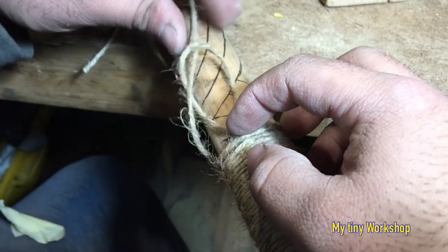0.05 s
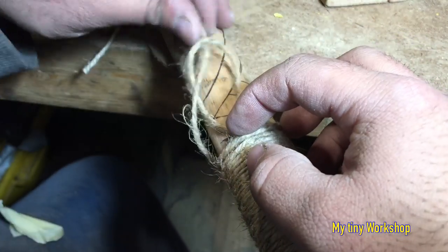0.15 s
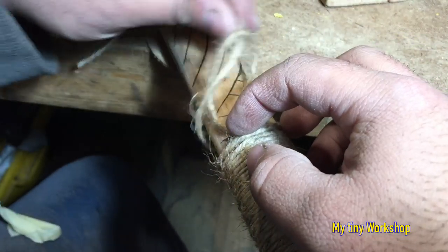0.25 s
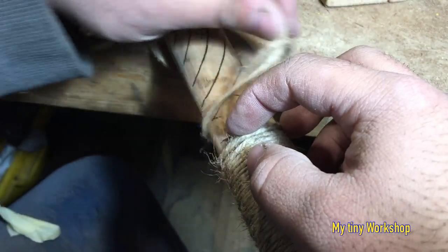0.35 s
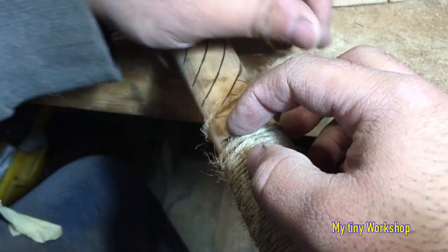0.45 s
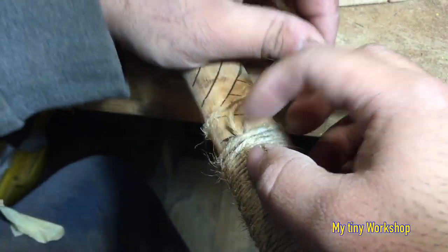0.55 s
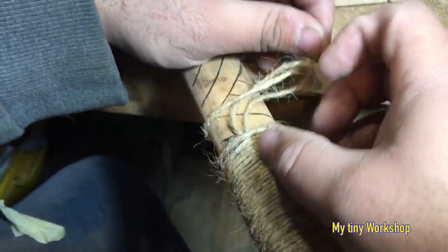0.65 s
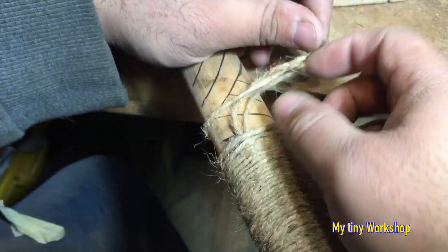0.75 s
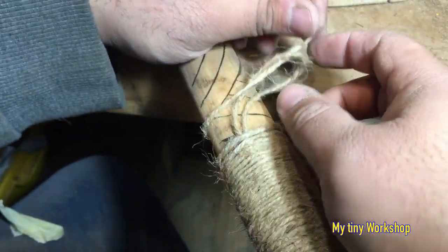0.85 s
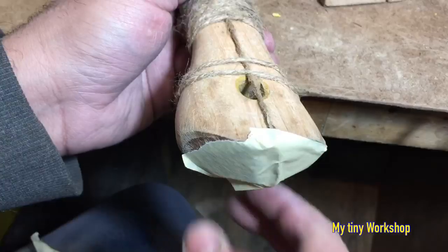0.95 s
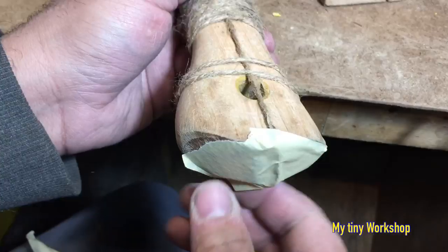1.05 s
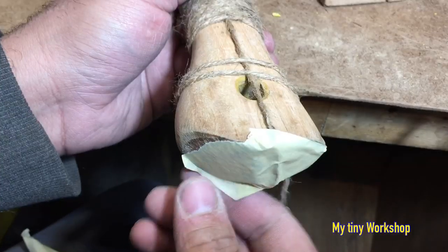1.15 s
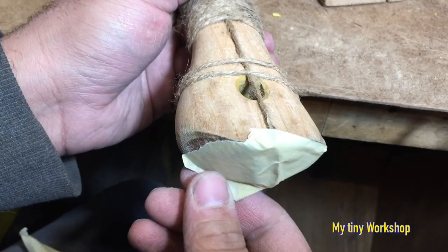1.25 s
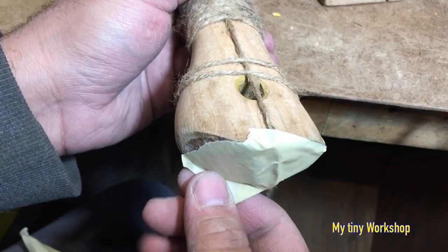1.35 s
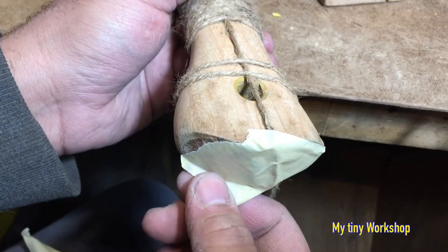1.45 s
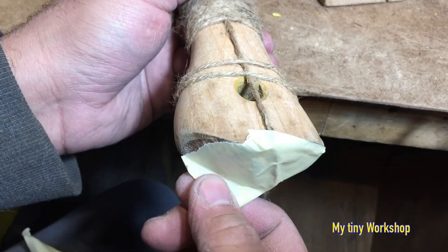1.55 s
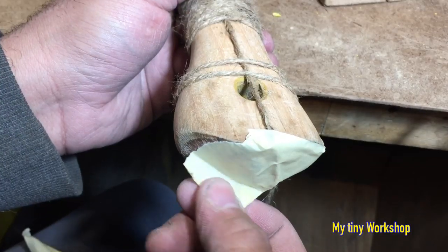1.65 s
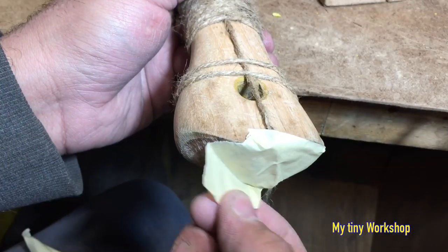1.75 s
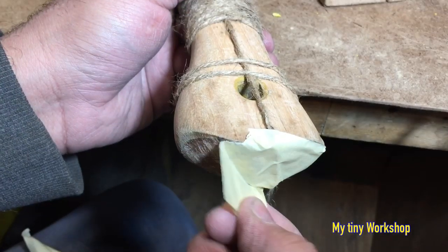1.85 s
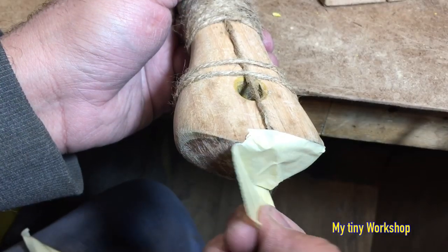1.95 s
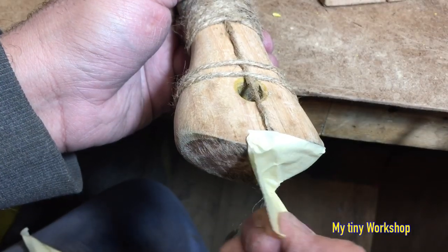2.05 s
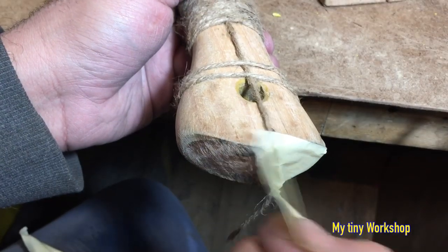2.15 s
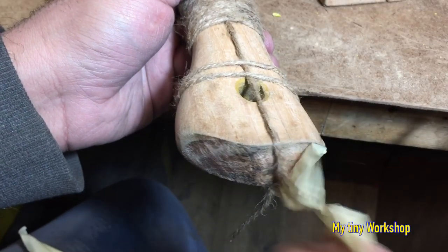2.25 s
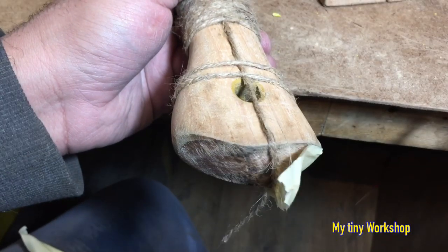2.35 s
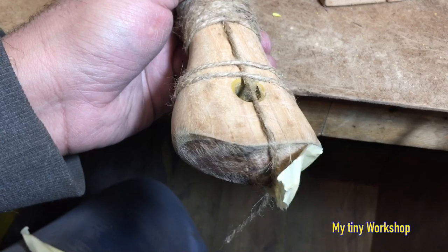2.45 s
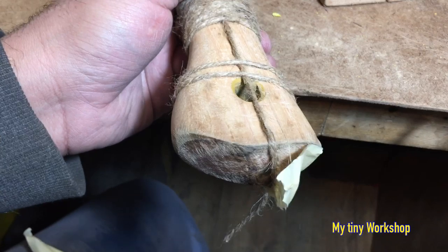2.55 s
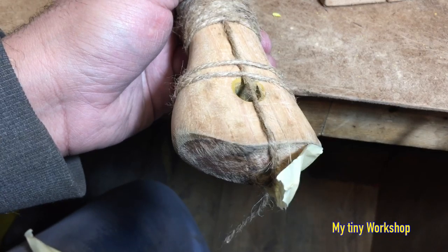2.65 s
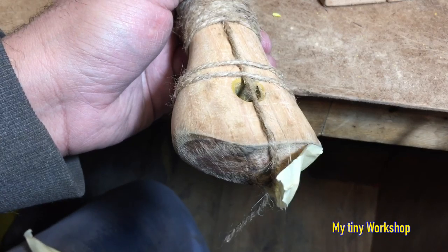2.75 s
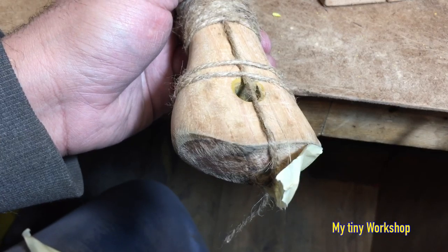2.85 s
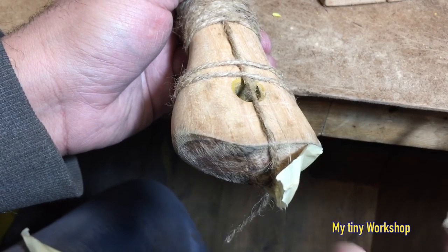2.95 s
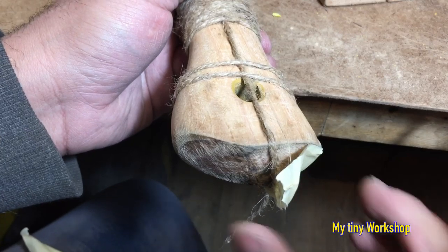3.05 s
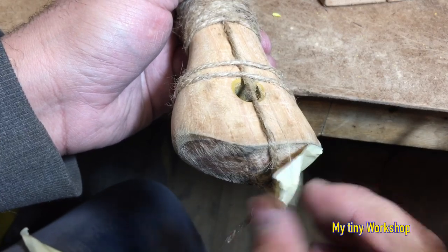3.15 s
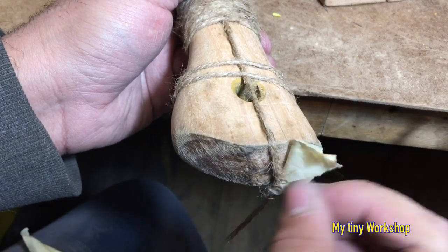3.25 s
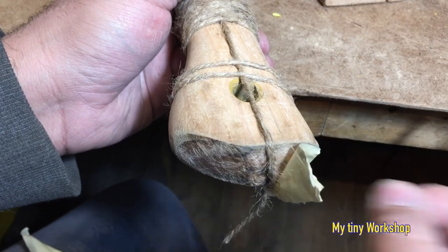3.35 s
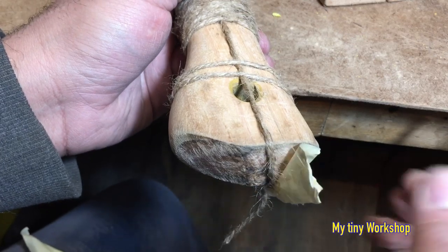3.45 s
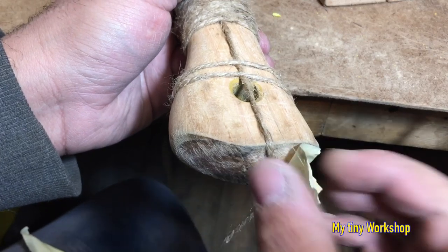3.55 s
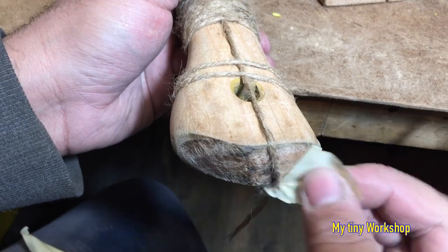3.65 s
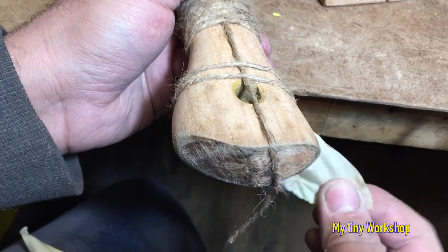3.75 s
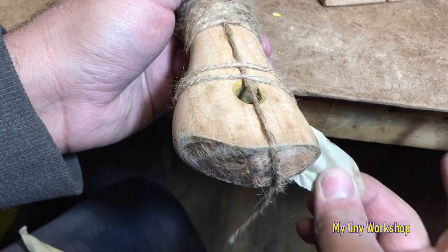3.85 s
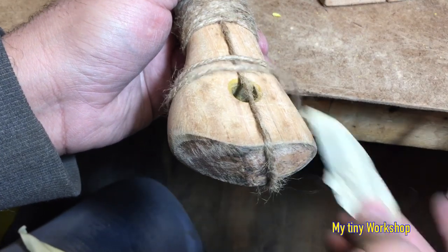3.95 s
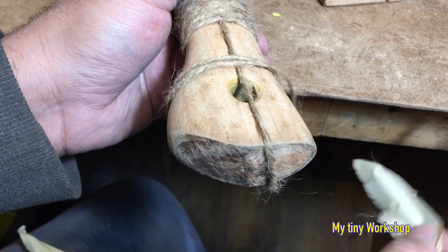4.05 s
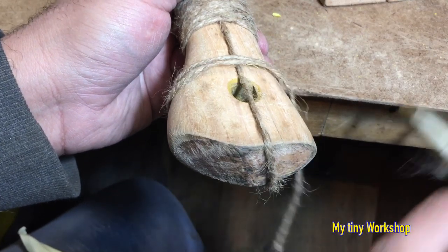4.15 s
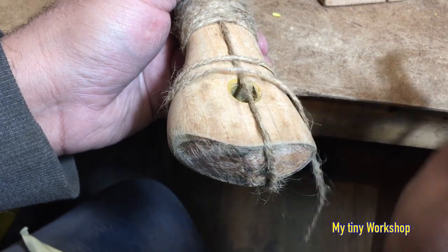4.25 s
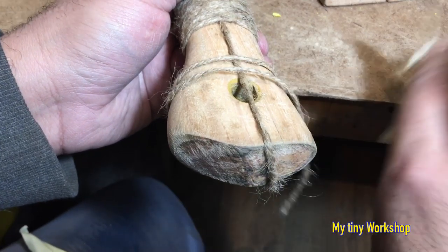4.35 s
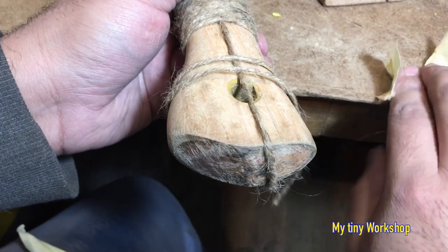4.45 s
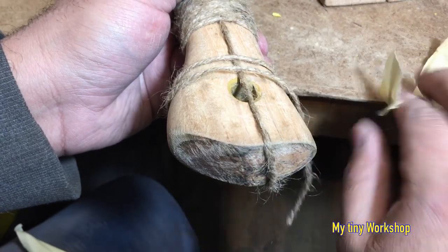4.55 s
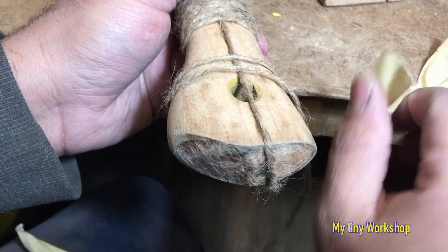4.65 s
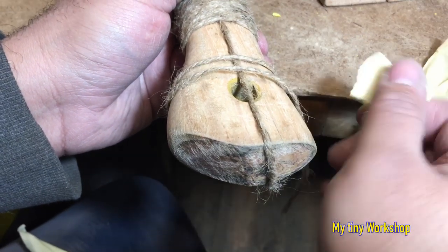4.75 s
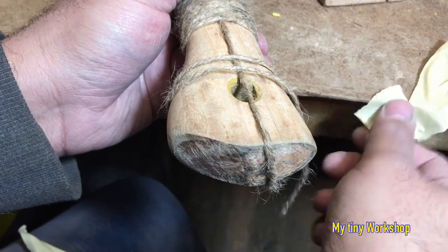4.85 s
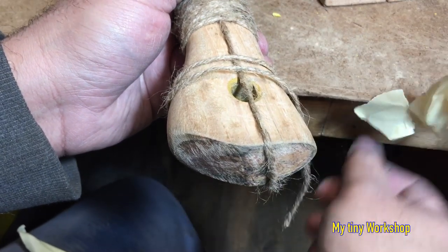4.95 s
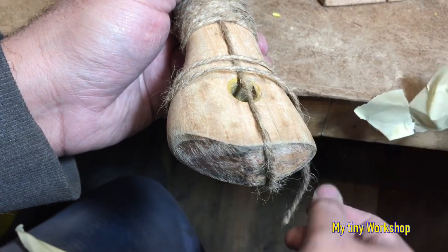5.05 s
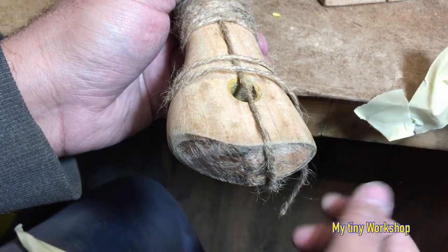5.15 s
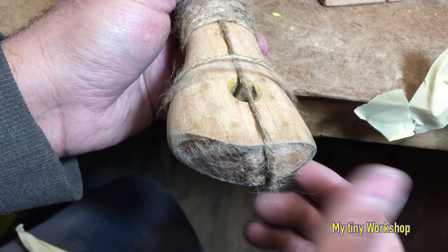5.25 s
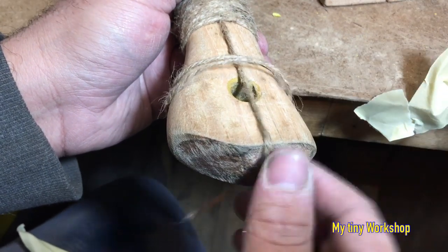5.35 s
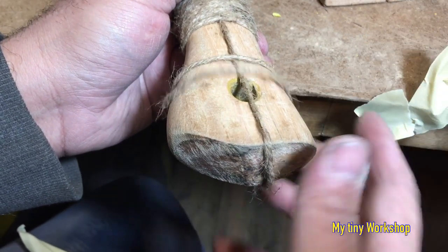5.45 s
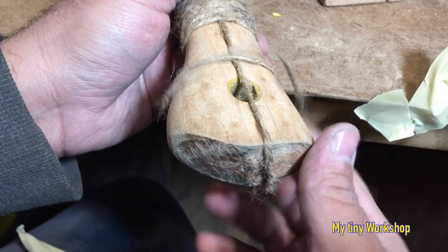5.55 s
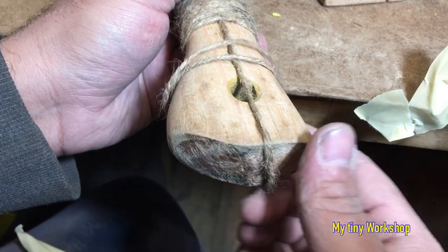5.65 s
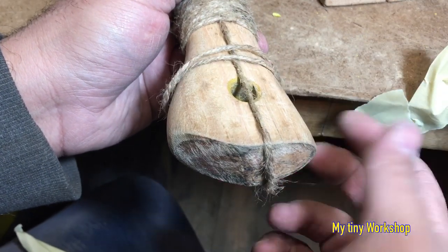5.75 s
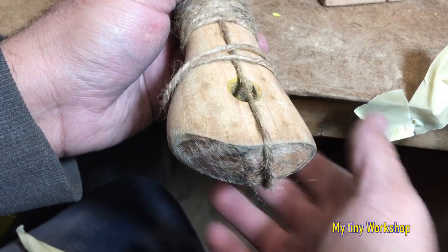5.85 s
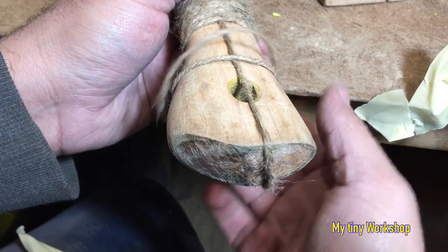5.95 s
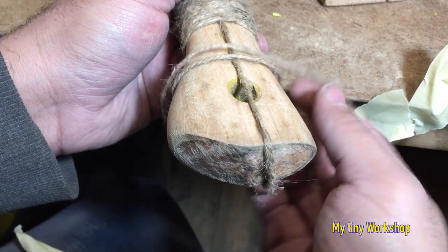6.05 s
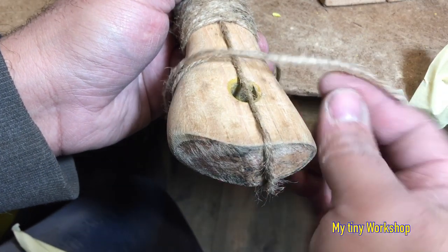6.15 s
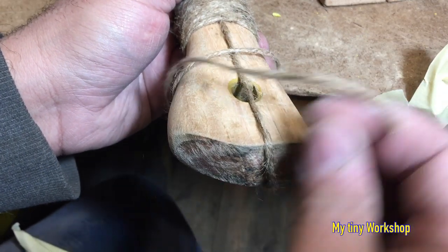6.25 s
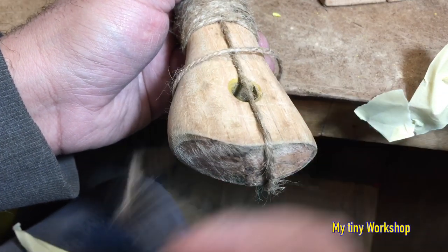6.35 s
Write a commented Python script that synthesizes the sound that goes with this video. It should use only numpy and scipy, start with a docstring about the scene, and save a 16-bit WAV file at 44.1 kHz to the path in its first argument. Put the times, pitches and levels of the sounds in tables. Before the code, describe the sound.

Close, dry tape peeling in two bursts of jerky rips with low thuds, then bumps, papery rubbing and a brief clatter on a bench.

```python
"""In a small, quiet workshop with a faint rumble, a squeak is heard and fingers rustle twine and paper. Masking
tape is then peeled from a wooden handle, close up, in two runs of short ripping tugs: glue threads snap as a
dense crackle shaped by paper resonances, and each jerk sets off a low thud of the damped modes of bench and
handle. The loose strip is pressed onto the bench, where something hard, probably a tool, rattles: noisy
contacts excite the tool's damped modes. A last rustle, squeaks and a faint knock follow."""
import sys
import numpy as np
from scipy import signal
from scipy.fft import rfft, irfft
from scipy.io import wavfile
from scipy.ndimage import uniform_filter1d

SR = 44100
rng = np.random.default_rng(int(sys.argv[2]) if len(sys.argv) > 2 else 0)


def digitize_waveform(pressure):
    """Quantize a signal to 16-bit integers and store it at the path in sys.argv[1].

    Rows of a 2-D input are taken as channels; values are limited to [-1, 1].
    """
    field = np.atleast_2d(pressure).T
    bounded = np.clip(field, -1, 1)
    quanta = np.round(bounded * 32767).astype(np.int16)
    wavfile.write(sys.argv[1], SR, quanta)


N = 281799
TIME = np.arange(N) / SR

# All source levels below are relative: the functions apply a further trim.
# Spectra of the room noise, skin, thuds, tape and knocks: freq_hz, density_db (per Hz)
FLOOR_SPECTRUM = [(15, -60.5), (25, -35), (43, -9), (70, -5), (170, -9.5), (293, -13.5), (607, -19.5),
                  (1130, -21.5), (1230, -22), (2110, -22), (2910, -24), (3250, -24.5), (3620, -24.5),
                  (8830, -30), (16000, -33.5)]
SKIN_SPECTRUM = [(180, -32), (300, -4.5), (425, -12.5), (478, -18), (565, -15), (915, -5), (1100, -5),
                 (1410, -4), (2790, -5), (4750, -8.5), (6000, -10), (13100, -17), (16000, -19)]
THUD_SPECTRUM = [(25, -50.5), (45, -26), (65, -8.5), (100, -3), (160, -0.5), (290, -4), (420, -9),
                 (700, -8), (1500, -41), (4000, -70.5)]
TAPE_SPECTRUM = [(180, -33), (300, -4), (331, -2), (478, -16.5), (574, -9.5), (814, -9.5), (1010, -3),
                 (1970, -3.5), (2100, 0.5), (2280, -4.5), (4020, 0), (6960, -3.5), (10600, -9),
                 (13100, -8.5), (16000, -17)]
KNOCK_SPECTRUM = [(150, -10), (600, 1), (1100, 5), (2200, -2.5), (3300, 2), (4800, -6), (5800, 2),
                  (7400, -10.5), (9500, -6.5), (11000, -18), (16000, -21.5)]
# Decay of the workshop: freq_hz, t60_s
ROOM_DECAY = [(150, 0.18), (1000, 0.16), (4000, 0.12), (9000, 0.13), (16000, 0.091)]
# Colour of the close sounds at the microphone: freq_hz, gain_db
CLOSE_COLOUR = [(800, 1), (1100, 1.5), (1400, 0), (4400, -1.5), (4900, -3.5), (5400, 0), (9500, 1),
                (10400, -4.5), (11300, 1), (13000, -0.5)]
# Faint squeaks of twine and skin on wood: start_s, length_s, pitch_hz, level_db
SQUEAKS = [(0.152, 0.048, 2900, -74), (0.914, .055, 2920, -67), (5.596, 0.014, 1750, -61.5),
           (6.025, 0.059, 1700, -69.5)]
# Fingers sliding on twine, tape and bench: start_s, rise_s, hold_s, fade_s (per 20 dB),
# level_db (3-9 kHz), body_db and fizz_db (relative to level_db)
RUBS = [(.62, 0.044, 0.057, .15, -75, 4, 1.5), (.815, 0.032, 0.033, .06, -67, -12, -0.5),
        (.865, 0.029, 0.022, 0.071, -72, 13, -5), (.91, .02, 0.038, .04, -70, -3, -7),
        (1.184, .01, 0.0028, 0.03, -47.5, 5, -14), (1.19, 0.022, 0.069, 0.0071, -56.5, -3.5, -4.5),
        (1.46, 0.015, 0.015, 0.042, -76, 1, 14.5), (1.572, .012, .004, .05, -68.5, -5, 12),
        (1.698, 0.0079, 0.0052, 0.055, -53.5, 8, 1), (2.44, 0.046, 0.1, .02, -63, -8.5, 1.5),
        (2.485, .043, 0.0034, 0.032, -52.5, -12, -4), (2.65, 0.033, .04, .06, -67, -20, -7),
        (2.72, 0.024, .005, 0.029, -66, -5, 4), (2.846, .03, 0.023, 0.045, -40, -20.5, 5.5),
        (2.95, 0.027, 0.0088, 0.021, -60.5, -9, 9), (3.228, 0.027, 0.1, .035, -55.5, -0.5, 1),
        (3.325, 0.021, 0.0092, 0.032, -46, -0.5, -13), (3.355, 0.017, 0.0023, 0.0097, -40, -3.5, -2),
        (4.406, 0.017, .005, 0.049, -46.5, 1, -1), (4.44, 0.019, .006, 0.054, -35.5, -1.5, -4),
        (4.46, .025, 0.011, 0.043, -39, 6, -6), (4.565, 0.035, 0.018, 0.019, -45.5, 2, -1.5),
        (4.9, 0.018, 0.0097, 0.021, -47.5, 8, -1), (4.93, 0.014, 0.084, 0.038, -55, -3, -5),
        (4.975, 0.025, 0.0025, 0.012, -36, -2.5, 4), (5.68, .045, .04, .05, -77, 5.5, 2.5),
        (6.03, .006, 0.0056, 0.036, -65, 8.5, -3)]
# The hand bumps handle or bench: start_s, level_db, length_s, ring_db, centre_hz
JOLTS = [(0.646, -64, 0.018, -7, 302), (1.192, -48.5, 0.0091, -9.5, 637), (1.706, -63, 0.019, -19, 500),
         (3.244, -63.5, 0.029, -5.5, 171), (3.35, -61.5, 0.028, -7.5, 148),
         (3.832, -49.5, 0.026, 11.5, 430), (4.06, -65, 0.017, -2, 150), (4.443, -32.5, 0.039, -7.5, 285),
         (4.486, -42.5, 0.047, -6.5, 280), (4.556, -47, 0.041, -9, 250), (4.628, -29.5, 0.035, -5, 260),
         (4.704, -40.5, 0.045, -2, 201), (4.91, -47, 0.04, -6, 284), (4.975, -44, 0.038, -34, 290),
         (4.988, -51, 0.026, 9, 144), (5.705, -59, 0.016, -3.5, 150), (6.038, -57, 0.033, 8, 119)]
# Low modes of the bench (65 Hz) and of the held handle (151, 338 Hz): freq_hz, level_db, t60_s
LOW_MODES = [(65.2, -13, 0.51), (151.4, 6.5, 0.2), (338, -0.5, 0.16)]
# Loudest snaps of glue and creased paper: start_s, level_db, centre_hz, sharpness_db
SNAPS = [(1.1942, -43.5, 1990, 5.5), (1.473, -45, 13500, 22), (1.6883, -46, 5700, 6),
         (1.8168, -36, 5200, 7), (1.8302, -40, 1800, 2), (1.8594, -41.5, 2770, 3), (1.8873, -58, 3400, 5),
         (2.0121, -41.5, 3400, 9), (2.1995, -46.5, 7700, 11), (2.2778, -24, 6330, 3.5),
         (2.3245, -26, 2600, 8), (2.3627, -22, 6400, 23), (2.3978, -23, 6040, 7),
         (3.2664, -28.5, 2300, 9.5), (3.3768, -53, 7600, 5.5), (3.7167, -31, 8100, 5),
         (3.7246, -20.5, 8250, 7.5), (3.737, -21.5, 5510, 6), (3.7565, -27.5, 5930, 11),
         (3.7698, -15.5, 4300, 4), (3.773, -23, 4660, 16), (3.7972, -20, 6700, 3), (3.8022, -18.5, 4700, 9),
         (3.8334, -17, 4120, 2), (3.9802, -35, 3580, 3), (3.9926, -29, 4800, 7), (4.0017, -25, 3790, 2.5),
         (4.2382, -57, 3200, 1.5), (4.611, -37, 4077, 0.5), (4.9062, -44, 2600, 3.5),
         (4.9441, -36, 6000, 6), (4.9758, -32, 3380, 2.5), (5.0025, -35, 7870, 4), (5.4149, -59.5, 3130, 0),
         (5.601, -62, 1800, 10.5), (6.036, -57, 2600, 5)]
# Pulls that lift the tape: start_s, hold_s, fade_s (per 20 dB), level_db (3-9 kHz),
# body_db and fizz_db (relative to level_db), thud_db
TUGS = [(1.593, 0.07, .04, -65, -5, -4, -82), (1.669, 0.011, 0.088, -48, -23, -7, -82),
        (1.719, 0.55, .06, -59, -9, -3.5, -76), (1.795, 0.055, 0.1, -50.5, 5.5, -5, -54.5),
        (1.925, 0.032, 0.017, -55.5, -4, -22, -69.5), (1.997, 0.057, 0.048, -53, -2.5, -10, -65),
        (2.097, 0.03, 0.056, -49, -5.5, -0.5, -66), (2.221, 0.0032, 0.023, -55, -23.5, 1, -80),
        (2.249, 0.015, 0.043, -38.5, -2.5, -3, -49.5), (2.305, 0.019, .03, -33.5, 0, -2, -53),
        (2.341, 0.045, 0.006, -22, -7, -5, -49), (3.647, .008, .02, -60, -1.5, -2.5, -74),
        (3.663, 0.0046, 0.0097, -38, 0.5, 2, -50), (3.693, 0.032, 0.016, -35, -11.5, -2, -65),
        (3.746, 0.07, 0.015, -33, -2.5, -8, -63), (3.82, 0.014, 0.12, -43.5, 8, 0.5, -54.5),
        (3.917, .03, .03, -52.5, -1, -1, -62), (3.953, 0.026, .02, -33.5, 5.5, -4.5, -42)]
# The free strip of tape: time_s, tautness (0-1), resonance_hz
STRIP = [(1.7, 0, 1400), (1.84, 1, 1610), (1.95, 1, 1510), (2.08, 0.9, 1670), (2.2, 0.9, 1700),
         (2.369, 0.4, 1720), (3.75, 0.1, 1426), (3.9, 0.35, 1160), (3.999, 0.34, 1100)]
# Steady resonances of the paper at the lifting edge: freq_hz, width_hz, level_db
PAPER_MODES = [(3140, 170, -5), (4500, 260, 1.5), (5500, 400, -6.5), (6800, 380, 6), (9150, 540, -1.5)]
# Knocks on the bench top: start_s, level_db, centre_hz, ring_db, contact_s, boom_db, spot struck
KNOCKS = [(4.448, -36, 1430, -12, 0.0075, -6, "side"), (4.5717, -42.5, 4180, 9.5, 0.0037, -2.5, "tip"),
          (4.6313, -22.5, 7010, -2.5, 0.0019, -18, "middle"),
          (4.7037, -34, 3600, 3.5, 0.0031, -30.5, "side"),
          (4.723, -34.5, 3000, -18.5, 0.0052, -37.5, "side"), (4.745, -40.5, 2800, -16, 0.012, -21, "side"),
          (6.032, -69, 2490, 7, 0.0053, -21.5, "side")]
# Modes of the tool: freq_hz, t60_s, tip_db, middle_db, side_db (level by spot struck)
TOOL_MODES = [(475, 0.12, -22.5, -7, -12.5), (1130, 0.14, -12, -6, -2.5), (1204, 0.068, -5, 0.5, -7.5),
              (1607, 0.13, -15.5, -13.5, -10.5), (1983, .16, -7, -10, -6.5), (2168, 0.11, -22, -20.5, -4.5),
              (2640, 0.035, -8.5, -5, 6.5), (3050, 0.059, 0, -15, -17), (3130, .09, -17, 0, -1.5),
              (3443, 0.14, -10, -7, -4), (3445, .09, -10.5, -13, -17), (3870, 0.097, -14, -5, -23.5),
              (4140, 0.087, 0, -16.5, -4.5), (4550, 0.16, -23.5, -20.5, -11), (5800, 0.067, 0, -6, -19),
              (5700, 0.1, -9.5, 2.5, -16), (5540, 0.038, 0.5, -5, -13.5), (5895, 0.14, -13, -23.5, -17.5),
              (6223, 0.0903, -9.5, -17, -13.5), (8000, .09, -21.5, -13.5, -21.5), (8850, .07, -25, -7, -12),
              (9300, .06, -26, -5, -1.5), (9715, 0.053, -24.5, 3, -10), (11500, .11, -16.5, -18, -26)]
# Names of the struck spots, in the order of the tool's level columns
SPOTS = ["tip", "middle", "side"]

FLOOR_DB = -69  # rms
EDGE_HZ = 15950  # upper band limit of the recorder
ATTACK_DB = 24  # how far a movement's sound climbs during its rise
RUB_SWELL_DB = -3.5  # a sliding finger eases off during its hold
TUG_RISE_S, TUG_SWELL_DB = .02, -2.5  # pulls take hold equally fast, then ease slightly during the hold
SLOW_DB, FAST_DB, MERGED_HISS = -49, -22, 1.3  # pull levels between which ruptures merge into hiss
# lesser snaps, with mean level relative to the pull and middle of the pitch range
SMALL_SNAPS_PER_S, SMALL_SNAP_DB, SMALL_SNAP_HZ, SMALL_SNAP_SHARP_DB = 45, 1, 5500, 5.5
THUD_LAG_S, THUD_S, THUD_STRETCH = .014, 0.041, .35  # stretch: seconds of thud per second of hold


def amp(db):
    """Converts decibels to an amplitude ratio."""
    return 10 ** (np.asarray(db) / 20)


def unit(x):
    """Normalizes to an rms amplitude of 1."""
    return x / np.sqrt(np.mean(x ** 2) + 1e-20)


def read(points, hz):
    """Interpolates a table along a logarithmic frequency axis."""
    freq_hz, value = np.transpose(points)
    return np.interp(np.log(hz + 1), np.log(freq_hz + 1), value)


def add(mix, start_s, sound):
    """Superposes a sound on the mix from its start time, in place."""
    part = mix[round(start_s * SR):][:len(sound)]
    part += sound[:len(part)]


def colour(x, spectrum, size=4096):
    """Minimum-phase filtering: the response is causal, so clicks keep their sharp fronts."""
    hz = abs(np.fft.fftfreq(size, 1 / SR))
    log_gain = np.log(amp(read(spectrum, hz)))
    # the Hilbert transform of the log gain gives the minimum phase
    response = np.exp(np.conj(signal.hilbert(log_gain)))
    taps = np.fft.ifft(response).real
    return signal.fftconvolve(x, taps[:size // 2])[:len(x)]


def hump(centre_hz, slope_db):
    """Broad resonance: a rounded peak whose flanks steepen toward 2 * slope_db per octave."""
    hz = np.geomspace(50, 20000, 40)
    octaves = np.log2(hz / centre_hz)
    return np.column_stack([hz, -slope_db * (np.hypot(1, 2 * octaves) - 1)])


def ring(modes, t):
    """Modal decay: a sum of exponentially damped sines."""
    return sum(amp(db - 60 * t / t60) * np.sin(2 * np.pi * hz * t) for hz, db, t60 in modes)


def resonate(x, hz, width_hz):
    """Single resonance of unit peak gain whose frequency follows the curve hz."""
    # shift the resonance down to zero frequency, low-pass, and shift back
    turn = np.exp(2j * np.pi * np.cumsum(hz) / SR)
    r = np.exp(-np.pi * width_hz / SR)
    return 2 * (turn * signal.lfilter([1 - r], [1, -r], x / turn)).real


def crackle(per_s, spread_db, hiss):
    """Impulsive noise: tiny ruptures of very uneven size in twelve pitch ranges, over a fine hiss."""
    grains = np.zeros(N)
    for hz in np.geomspace(1000, 15000, num=12):
        sizes = amp(spread_db * np.minimum(rng.exponential(1, N), 4)) * rng.choice([-1, 1], N)
        clicks = sizes * (rng.random(N) < per_s / 12 / SR)
        grains += unit(colour(clicks, hump(hz, 3.2), size=512)) * np.sqrt(hz)
    return unit(grains) + hiss * rng.standard_normal(N)


def crumple(x, patchy_db):
    """Changing geometry: as paper deforms, narrow resonances come and go within hundredths of a second."""
    z = signal.stft(x, nperseg=256)[2]
    patches = uniform_filter1d(rng.standard_normal(z.shape), size=3, axis=0)  # across frequency
    patches = uniform_filter1d(patches, size=12, axis=1)  # across time
    return signal.istft(z * amp(patchy_db * unit(patches)))[1][:N]


def gestures(rows, swell_db):
    """Power addition: body, middle and fizz levels rise, hold and fade; overlapping movements sum in power."""
    clock, power = TIME[::16], 0
    for start, rise_s, hold_s, fade_s, db, body_db, fizz_db in rows:
        held = clock - start - rise_s
        attack = amp(ATTACK_DB * np.minimum(held / rise_s, 0))
        drift_db = swell_db * (np.clip(held / hold_s, 0, 1) - .5)
        fade_db = 20 * np.maximum(held - hold_s, 0) / fade_s
        levels = amp([db + body_db, db, db + fizz_db])
        power = power + np.outer(levels, attack * amp(drift_db - fade_db)) ** 2
    return [np.interp(TIME, clock, np.sqrt(band)) for band in power]


def stroke(levels, grains, body_db, mid_db, fizz_db, judder_db):
    """Stick-slip friction: grains judder under a gesture; slack paper adds body, a taut edge adds fizz."""
    hz = np.fft.rfftfreq(N, 1 / SR)
    low = 1 / (1 + (hz / 3000) ** 6)
    high = 1 - 1 / (1 + (hz / 9000) ** 16)
    spectrum, out = rfft(grains), np.zeros(N)
    for share, level, db in zip([low, 1 - low - high, high], levels, [body_db, mid_db, fizz_db]):
        band = irfft(spectrum * share, N)
        # even out the slow level changes, so that the gesture sets the level
        local_rms = np.sqrt(uniform_filter1d(band ** 2, size=700) + 1e-12)
        out += amp(db) * level * band / local_rms
    judder = unit(uniform_filter1d(rng.standard_normal(N), size=200))
    return out * amp(judder_db * judder)


def floor():
    """Stationary noise: faint room rumble and microphone hiss."""
    return amp(FLOOR_DB) * unit(colour(rng.standard_normal(N), FLOOR_SPECTRUM))


def room(x, wet_db, first_s=0.0045):
    """Reverberation: dense early echoes from bench and walls, each band dying at its own speed."""
    t = np.arange(SR // 2) / SR
    taps = rng.standard_normal(len(t)) * (rng.random(len(t)) < 4000 / SR) * (t > first_s)
    hz, when, z = signal.stft(taps, SR, nperseg=256)
    decay = amp(-60 * when / read(ROOM_DECAY, hz)[:, None])
    tail = signal.istft(z * decay, SR)[1]
    return x + amp(wet_db) * signal.fftconvolve(x, tail / np.linalg.norm(tail))[:N]


def squeaks(width_hz=40):
    """Frictional locking: noise through two narrow resonances briefly holds one wavering pitch."""
    out, t = np.zeros(N), np.arange(SR // 8) / SR
    for start, length_s, hz, db in SQUEAKS:
        pitch = np.full(len(t), hz)
        tone = resonate(rng.standard_normal(len(t)), pitch, width_hz)
        tone = resonate(tone, pitch, width_hz)[::-1]  # reversed, so the filter's build-up comes last
        envelope = np.sin(np.pi * np.minimum(t / length_s, 1))
        add(out, start, amp(db) * unit(tone) * envelope)
    return out


def rub():
    """Sliding friction: skin on crepe paper, fibres and wood gives a denser, softer grain than peeling."""
    grains = crackle(per_s=6000, spread_db=3.5, hiss=0.94)
    grains = colour(crumple(grains, patchy_db=1.6), SKIN_SPECTRUM)
    levels = gestures(RUBS, RUB_SWELL_DB)
    return stroke(levels, grains, body_db=-2.64, mid_db=-0.9, fizz_db=-0.6, judder_db=0.5)


def jolts(rows):
    """Forced and free vibration: a dull push, under which the low modes of bench and handle swell and ring out."""
    out, t = np.zeros(N), np.arange(SR // 2) / SR
    for start, db, length_s, ring_db, centre_hz in rows:
        rise = 3 * t / length_s
        shape, tint = rise * np.exp(1 - rise), hump(centre_hz, 4.3)
        push = shape * colour(colour(rng.standard_normal(len(t)), THUD_SPECTRUM), tint)
        push *= np.sqrt(np.sum(shape ** 2) / np.sum(push ** 2))
        swell = 1 - np.exp(-(1.6 * t / length_s) ** 2)
        modes = swell * colour(ring(LOW_MODES, t), tint)
        add(out, start, amp(db - 2.5) * push + amp(db + ring_db + 6.5) * modes)
    return out


def snaps(rows, decay_s=0.00081):
    """Sudden release: a patch of glue or a crease gives way in a spike and a brief flutter of paper."""
    out, t = np.zeros(N), np.arange(1024) / SR
    paper = [(200, -17), (1000, 4), (6000, -9), (16000, -4.5)]  # freq_hz, gain_db
    for start, db, hz, sharp_db in rows:
        push = .25 * rng.standard_normal(len(t)) * np.exp(-t / decay_s)
        push[0] += 1
        snap = colour(colour(push, hump(hz, abs(sharp_db)), size=1024), paper)
        add(out, start, amp(db) * snap / np.sqrt(np.mean(snap[:130] ** 2)))  # rms of the first 3 ms
    return amp(-2.53) * out


def peel(strip_width_hz=300, strip_db=6):
    """Adhesive fracture: glue threads break singly when slow, merge when fast; a tauter strip rings more."""
    pulls = gestures([(start, TUG_RISE_S, *rest) for start, *rest, _ in TUGS], TUG_SWELL_DB)
    middle_db = 20 * np.log10(pulls[1] + 1e-9)
    speed = np.clip((middle_db - SLOW_DB) / (FAST_DB - SLOW_DB), 0, 1)
    ruptures = crackle(per_s=4500, spread_db=5.2, hiss=.4)
    ruptures += MERGED_HISS * speed * rng.standard_normal(N)
    grains = colour(crumple(ruptures, patchy_db=2.6), TAPE_SPECTRUM)
    time_s, *columns = np.transpose(STRIP)
    taut, strip_hz = (np.interp(TIME, time_s, column) for column in columns)
    ringing = amp(strip_db) * resonate(grains, strip_hz, strip_width_hz)
    ringing += sum(amp(db) * resonate(grains, np.full(N, hz), width) for hz, width, db in PAPER_MODES)
    grains = grains + np.clip(taut, 0, 1) * ringing
    return stroke(pulls, grains, body_db=-4.5, mid_db=-2.0, fizz_db=-1.0, judder_db=1.37)


def tug_thuds(ring_db=5, centre_hz=175):
    """Impulsive reaction: every pull jerks the handle against the bench, longer under a long pull."""
    return [(start + THUD_LAG_S, thud_db, THUD_S + THUD_STRETCH * hold_s, ring_db, centre_hz)
            for start, hold_s, *_, thud_db in TUGS]


def small_snaps():
    """Poisson process: lesser snaps fall at random while a pull holds, in proportion to its strength."""
    rows = []
    for start, hold_s, _, db, *_ in TUGS:
        wait, size, pitch = rng.random((40, 3)).T
        after = np.cumsum(-np.log(1 - wait)) / SMALL_SNAPS_PER_S
        level_db = db + SMALL_SNAP_DB + 6 * (size - .5)
        centre_hz = SMALL_SNAP_HZ * 2 ** (pitch - .5)
        drawn = np.column_stack([start + TUG_RISE_S + after, level_db, centre_hz])
        rows += [(*row, SMALL_SNAP_SHARP_DB) for row in drawn[after < hold_s]]
    return rows


def knocks(clatter_db=-19, clatter_t60=.13, boom_rise_s=.025):
    """Impact excitation: a hard contact and dying clatter, the tool's modes and the boom of the bench top."""
    out, t = np.zeros(N), np.arange(SR // 3) / SR
    early = slice(0, SR // 100)  # the first 10 ms set the level
    boom = ring(LOW_MODES[:1], t) * (1 - np.exp(-(t / boom_rise_s) ** 2))
    for start, db, hz, ring_db, contact_s, boom_db, spot in KNOCKS:
        shape = np.exp(-t / contact_s) + amp(clatter_db - 60 * t / clatter_t60)
        crack = colour(colour(shape * rng.standard_normal(len(t)), KNOCK_SPECTRUM), hump(hz, 2.0))
        # each spot stirs the modes in its own proportions, with random polarity
        column = SPOTS.index(spot)
        tone = sum(rng.choice([-1, 1]) * ring([(mode_hz, levels[column], t60)], t)
                   for mode_hz, t60, *levels in TOOL_MODES)
        add(out, start, amp(db + 2.5) * crack / crack[early].std())
        add(out, start, amp(db + ring_db + 3) * tone / tone[early].std())
        add(out, start, amp(db + boom_db - 0.5) * boom / boom.max())
    return out


def scene():
    """Direct-to-reverberant ratio: the tape is close by, the knocks on the bench a little farther off."""
    bench = room(knocks(), wet_db=-11.5) + jolts(JOLTS + tug_thuds()) + floor()
    close = peel() + rub() + squeaks() + snaps(SNAPS) + snaps(small_snaps())
    return (room(colour(close, CLOSE_COLOUR), wet_db=-15) + bench)[None]


def record(dry):
    """Band limitation: a linear-phase low-pass filter sets the recorder's upper edge."""
    taps = signal.firwin(511, EDGE_HZ, window=("kaiser", 9), fs=SR)
    return signal.oaconvolve(dry, taps[None], "same")


dry = scene()
out = record(dry)
digitize_waveform(out)
```